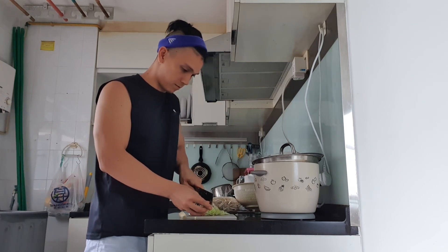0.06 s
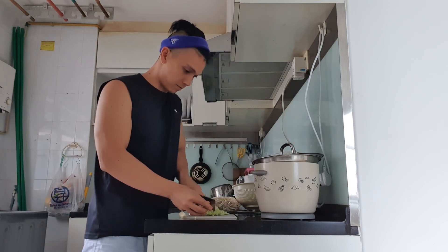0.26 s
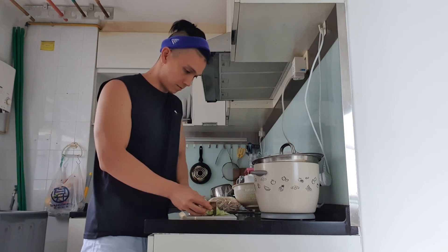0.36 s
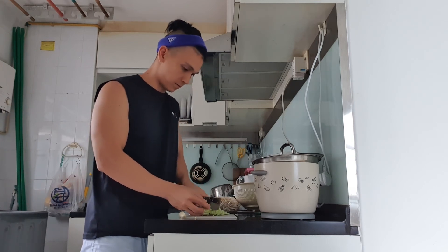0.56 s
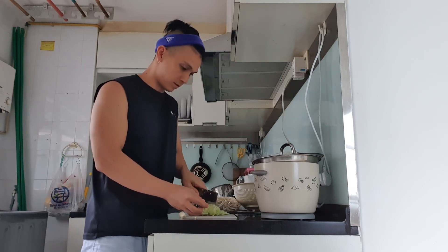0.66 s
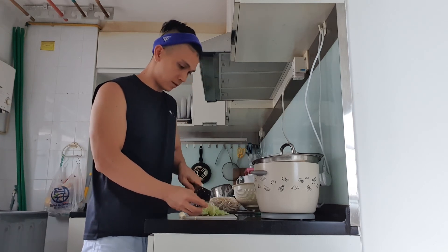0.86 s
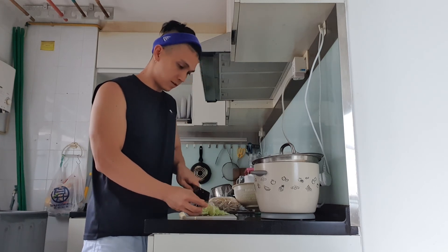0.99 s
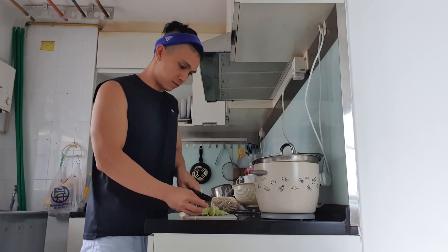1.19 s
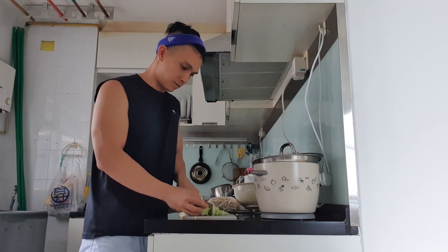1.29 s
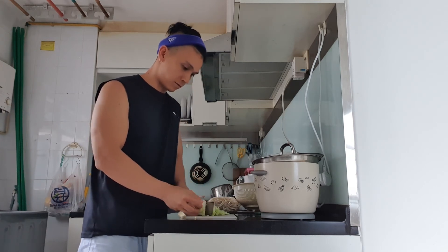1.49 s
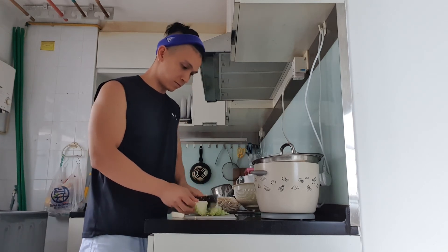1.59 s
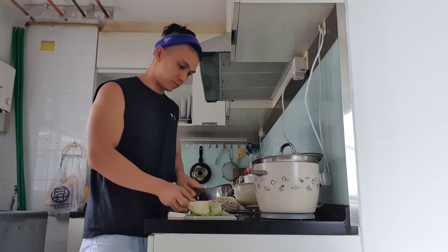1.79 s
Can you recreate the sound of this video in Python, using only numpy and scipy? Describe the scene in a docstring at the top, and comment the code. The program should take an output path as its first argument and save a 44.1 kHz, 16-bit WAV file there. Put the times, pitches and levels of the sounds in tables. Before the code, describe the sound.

A knife chops cabbage on a plastic board. Soft leaf rustling and a rising crunch lead to loud snaps and a hard, clicking knock at 0.3 seconds. A faint rub follows near 0.7; rustling resumes around 1.0, and a second, slightly softer, duller chop lands at 1.3. A faint slide comes at 1.5. The small tiled kitchen rings for about half a second over steady low hum.

```python
"""A small tiled kitchen: two slow knife strokes go through a cabbage on a plastic board.
Filtered random grains make the slide on the leaves and the crunch, which swells as the blade sinks;
noise bursts make single snaps. At the board, filtered impulses give thud and tick and ring its modes.
Echoes and decaying noise make the room, which rings for about half a second;
a low hum of narrow noise bands, a faint steady tone and soft air lie under it all."""
import sys
import numpy as np
from scipy import signal
from scipy.fft import rfft, irfft, next_fast_len
from scipy.io import wavfile

SR = 44100
rng = np.random.default_rng(int(sys.argv[2]) if len(sys.argv) > 2 else 0)


def inscribe(sig):
    """Save sig as 16-bit PCM at rate SR to the path in sys.argv[1].

    A 1-D sig is mono; a 2-D sig holds one channel per row.
    Samples are clipped to [-1, 1] before scaling.
    """
    pcm = np.round(np.clip(np.atleast_2d(sig).T, -1, 1) * 32767)
    wavfile.write(sys.argv[1], SR, pcm.astype(np.int16))


N = 81585  # samples
FFT_SIZE = 2 * next_fast_len(N)

# Knife strokes: blade meets board [t/s], knock [level/dB], tick [level/dB], crunch [level/dB],
# length of the cut [t/s]; levels are relative within each layer
CHOPS = [(0.3136, 0.5, -0.5, -3, 0.15), (1.3159, -1.5, -7, -5, 0.15)]
# Spectral colour of breaking leaf: [f/Hz, level/dB]
LEAF_COLOUR = [(150, -9.5), (340, 1.5), (800, -4.5), (1800, -10.5), (2600, -4), (3600, 4), (5000, -2.5),
               (5800, -8.5), (6800, -5), (8000, -11), (12000, -11), (15500, -17)]


def undb(db):
    """Amplitude ratio from a level in decibels."""
    return 10 ** (np.asarray(db) / 20)


def unit(x):
    """Normalisation to an rms amplitude of 1."""
    return x / np.sqrt(np.mean(x ** 2))


def at_hz(points, hz):
    """Interpolation of (f/Hz, value) points on a logarithmic frequency axis."""
    p = np.array(points)
    return np.interp(np.log(np.maximum(hz, 1)), np.log(p[:, 0]), p[:, 1])


def bins():
    """Frequencies in Hz of the discrete spectrum used for filtering."""
    return np.arange(FFT_SIZE // 2 + 1) * SR / FFT_SIZE


def shape(x, gain):
    """Linear filtering: multiplication of the spectrum by a transfer function."""
    return irfft(rfft(x, FFT_SIZE) * gain)[..., :N]


def colour(x, points):
    """Minimum-phase filtering: the folded cepstrum gives (f/Hz, level/dB) points a causal response."""
    cepstrum = irfft(np.log(undb(at_hz(points, bins()))))
    cepstrum[1:FFT_SIZE // 2] *= 2
    cepstrum[FFT_SIZE // 2 + 1:] = 0
    return shape(x, np.exp(rfft(cepstrum)))


def convolve(x, response):
    """Superposition: each sample of the sound launches a scaled impulse response."""
    return shape(x, rfft(response, FFT_SIZE))


def pan(db):
    """Interaural level difference, left minus right in dB, split evenly between the channels."""
    return undb(np.array([[db], [-db]]) / 2)


def click(s):
    """Unit impulse at a time in seconds."""
    return (np.arange(N) == round(s * SR)).astype(float)


def ring(hz, t60, delay_s=0):
    """Damped mode: a sinusoid whose amplitude falls 60 dB in t60 seconds."""
    t = np.maximum(np.arange(N) / SR - delay_s, 0)
    return np.sin(2 * np.pi * hz * t) * np.exp(-np.log(1000) * t / t60)


def burst(start_s, decay_s):
    """Transient noise: an exponentially decaying crackle of unit energy."""
    age = np.arange(N) / SR - start_s
    y = rng.standard_normal(N) * (age >= 0) * np.exp(-np.abs(age) / decay_s)
    return y / np.sqrt(np.sum(y ** 2))


def grains(rate, spread_db):
    """Shot noise: random impulses (mean rate per second) of uneven size and either sign, rms 1."""
    present = rng.random(N) < rate / SR
    sign = np.sign(rng.standard_normal(N))
    size = undb(spread_db * np.clip(rng.standard_normal(N), -2, 2))
    return unit(present * sign * size)


def blows():
    """Impulsive excitation: one push for each stroke that reaches the board."""
    return sum(undb(db) * click(s) for s, db, *_ in CHOPS)


def thud():
    """Elastic contact: the edge pushes into the plastic, which springs back and settles."""
    # [f/Hz, level/dB]
    thud_colour = [(60, -48), (130, -23), (230, -10), (330, 1), (600, -1), (1150, 2.5), (1420, -9),
                   (2100, -10.5), (3200, -28.5), (5000, -31)]
    rebound = undb(-8) * click(0.00463)  # pull
    settling = undb(-11.5) * click(0.0087)  # second push
    contact = click(0) - rebound + settling
    return undb(12) * colour(convolve(blows(), contact), thud_colour)


def tick():
    """Hard impact: the first contact of steel and board is a brief, broadband impulse."""
    # [f/Hz, level/dB]
    tick_colour = [(400, -12.5), (1400, 1), (2000, 3.5), (3000, -0.5), (4500, 0), (7000, -16.5),
                   (15000, -25)]
    impacts = sum(undb(db) * click(s) for s, _, db, *_ in CHOPS)
    return undb(5) * colour(impacts, tick_colour)


def board():
    """Modal response with dispersion: each blow rings board and counter, the low modes arriving last."""
    # Modes of the board on the counter: [f/Hz, level/dB, t60/s, left minus right level/dB]
    board_modes = [(180.3, -12.5, 0.61, -7.5), (229.8, -21, 0.39, 21.5), (327.4, 4, .14, 1),
                   (389, -10, 0.42, -2), (418, -9.5, 0.27, -4), (460.4, -2, 0.18, -1),
                   (538, -0.5, 0.049, -8), (713, -9.5, 0.1, 14), (800, -2, 0.18, 10), (905, -8, 0.13, -8),
                   (967, -27, .2, 1), (1032, 0, 0.084, 10), (1076, -9.5, 0.32, 12), (1190, -14.5, 0.44, -7)]
    response = 0
    for k, (hz, db, t60, side_db) in enumerate(board_modes):
        delay_s = 0.0027 * (330 / hz) ** 2  # low bending waves cross the board late
        polarity = (-1) ** k  # neighbouring modes swing opposite ways
        response = response + polarity * undb(db) * ring(hz, t60, delay_s) * pan(side_db)
    return undb(-23) * convolve(blows(), response)


def crunch(count):
    """Cumulative fracture: cells at one of count places burst harder as the blade sinks to the board."""
    cells_per_s, rise_db, stop_s = 2000, 31.5, 0.0085  # cell rate over all places
    t, force = np.arange(N) / SR, 0
    for s, _, _, db, length in CHOPS:
        depth = 1 + (t - s) / length  # 0 at the start of the cut, 1 at the board
        growth = undb(db + rise_db * (np.minimum(depth, 1) - 1))
        stop = np.exp(-np.maximum(t - s, 0) / stop_s)
        force = force + (depth > 0) * growth * stop
    cells = grains(cells_per_s / count, spread_db=3) / np.sqrt(count)
    return colour(undb(-20) * force * cells, LEAF_COLOUR)


def snaps():
    """Brittle fracture: thick leaves give way singly, a little duller than the fine crunch."""
    # Snapping leaves: [t/s, relative level/dB]
    leaf_snaps = [(0.059, -16), (0.157, -15.5), (0.195, -13), (0.27, -10.5), (0.2833, 5.5), (0.31, 5),
                  (0.890, -29), (0.970, -36), (1.023, -24.5), (1.044, -18), (1.18, -14), (1.257, -11),
                  (1.2786, 3.5), (1.29, -2.5)]
    cracks = sum(undb(db) * burst(s, decay_s=0.0034) for s, db in leaf_snaps)
    lowpass = 1 / np.hypot(1, (bins() / 6600) ** 2)
    return undb(-2.5) * colour(shape(cracks, lowpass), LEAF_COLOUR)


def slides():
    """Sliding friction: blade and fingers make many tiny contacts with the waxy leaves."""
    # Slides: [start t/s, length t/s, relative level/dB, tilt above 2 kHz in dB per octave]
    slide_strokes = [(-0.04, 0.089, -52, -2.5), (0.05, 0.056, -50, -2), (0.091, 0.13, -47, -2),
                     (0.204, 0.086, -43, 1), (0.673, 0.12, -54.5, -7), (1.026, 0.048, -52, 5),
                     (1.071, 0.047, -45, 2.5), (1.12, 0.066, -51, -0.5), (1.182, 0.1, -47.5, 6),
                     (1.513, .11, -53.5, -4), (1.803, .08, -83, -3)]
    # [f/Hz, level/dB]
    slide_colour = [(400, 6.5), (1300, -0.5), (2200, -9), (3100, -1), (5000, -4), (8000, -8), (11500, -4.5),
                    (15500, -14.5)]
    edge_s = 0.0085
    t, out = np.arange(N) / SR, 0
    rub = colour(grains(rate=1300, spread_db=4), slide_colour)
    octaves = np.log2(np.maximum(bins(), 2000))
    for s, length, db, tilt_db in slide_strokes:
        inside = np.minimum(t - s, s + length - t)  # time from the nearer end
        pressure = (1 + np.tanh(inside / edge_s / 2)) / 2
        tilted = unit(shape(rub, undb(tilt_db * octaves)))
        out = out + undb(db) * pressure * tilted
    return undb(-7) * out


def blade(x):
    """Forced resonance: the steel adds its short ring to whatever shakes it."""
    # Modes of the blade: [f/Hz, level/dB, t60/s]
    blade_modes = [(3117, -32.5, 0.024), (3720, -39.5, 0.0062), (4120, -47.5, 0.0097), (6600, -39, 0.013)]
    response = sum(undb(db) * ring(hz, t60) for hz, db, t60 in blade_modes)
    return x + convolve(x, response)


def diffuse(hz):
    """Diffuse field: the spectrum of stereo noise, alike in the bass and unrelated in the treble."""
    alike = .98 / (1 + np.square((hz / 475) ** 2))  # correlation of left and right, halved at 475 Hz
    mid, side = rng.standard_normal((2, len(hz))) + 1j * rng.standard_normal((2, len(hz)))
    return mid * np.sqrt(1 + alike) + side * np.sqrt(1 - alike) * np.array([[1], [-1]])


def kitchen(size=32768):
    """Room response: direct sound with early reflections, and a reverberant tail decaying band by band."""
    # Nearest surfaces: [delay to the left t/s, delay to the right t/s, level/dB re direct sound]
    echoes = [(.0021, .0013, -9.5), (.0062, .0071, -0.5), (0.0354, 0.025, -7.5)]
    # Reverberation: [f/Hz, t60/s]
    room_decay = [(300, 0.5), (1100, 0.58), (3000, 0.46), (8000, 0.49), (15000, 0.32)]
    t, hz = np.arange(size) / SR, np.arange(size // 2 + 1) * SR / size
    early = click(0)
    for left, right, db in echoes:
        early = early + undb(db) * np.array([click(left), click(right)])
    early = early[:, :size]

    noise, tail = diffuse(hz), 0
    for centre, t60 in room_decay:
        # triangular band: 1 at its centre, 0 at its neighbours
        band = at_hz([(f, float(f == centre)) for f, _ in room_decay], hz)
        tail = tail + irfft(noise * band) * np.exp(-np.log(1000) * t / t60)
    tail = tail * (1 - np.exp(-t / 0.0011))  # build-up
    return early / np.sqrt(np.sum(early ** 2) / 2), tail / np.sqrt(np.sum(tail ** 2) / 2)


def heard(x, wet_db):
    """Reverberation: a source on its own spot gets early sound and an independent diffuse tail."""
    early, tail = kitchen()
    return convolve(x, early + undb(wet_db) * tail)


def background():
    """Stationary noise: a low wavering hum of narrow bands and a faint steady tone over soft room air."""
    # Room air: [f/Hz, relative level/dB per Hz]
    air_colour = [(20, -19), (35, -10), (50, 0.5), (80, 2), (140, -1.5), (230, -17), (340, -9.5), (580, -8),
                  (800, -17), (1250, -19), (1700, -31), (2500, -34), (4500, -34), (7500, -47), (15000, -59)]
    # Hum resonances: [f/Hz, full width at half amplitude f/Hz, rms level/dB]
    hum_bands = [(60.6, 19.6, -47.5), (99.2, 15.3, -43), (113.8, 9.2, -45), (152.8, 3.8, -53),
                 (182.7, 8.6, -61), (362.2, 19, -58.5)]
    f = bins()

    def noise(gain):
        """Filtered diffuse noise of rms 1."""
        return unit(irfft(diffuse(f) * gain)[:, :N])

    air = undb(-44) * noise(undb(at_hz(air_colour, f)))
    drone = undb(-58.5) * unit(np.sin(2 * np.pi * 365 * np.arange(N) / SR))
    hum = 0
    for hz, width, db in hum_bands:
        resonance = 1 / (1 + np.square(((f - hz) / width * 2) ** 2))
        hum = hum + undb(db) * noise(resonance)
    return air + drone + hum


def scene(count=4):
    """Superposition of sources: knife and leaves a little to the left, cut at count places; board; room."""
    cutting = [blade(crunch(count)) for _ in range(count)]
    cutting += [blade(snaps()), slides()]
    leaves = sum(heard(x, wet_db=3.5) for x in cutting)
    contact = heard(thud(), wet_db=3.5) + heard(blade(tick()), wet_db=1.5)
    knock = board()
    _, tail = kitchen()
    knock = knock + undb(-11) * convolve(knock, tail)
    return (leaves + contact) * pan(1.9) + knock + background()


def record(dry):
    """Band limitation: the recorder cuts the top of the treble with a steep low-pass at 15750 Hz."""
    lowpass = signal.ellip(12, .1, 80, 15750, fs=SR, output="sos")  # order, ripple/dB, rejection/dB
    return signal.sosfilt(lowpass, dry)


dry = scene()
out = record(dry)
inscribe(out)
```